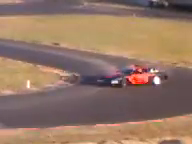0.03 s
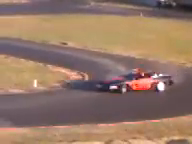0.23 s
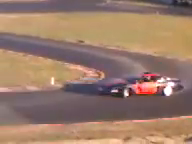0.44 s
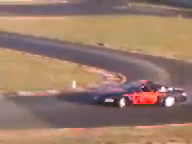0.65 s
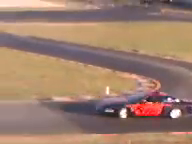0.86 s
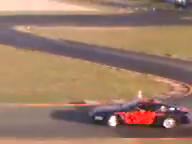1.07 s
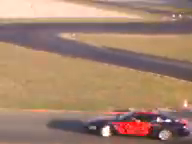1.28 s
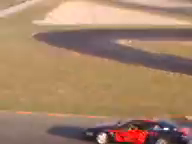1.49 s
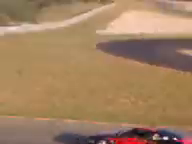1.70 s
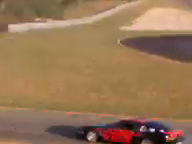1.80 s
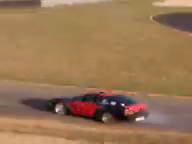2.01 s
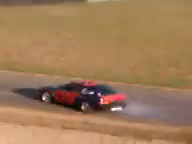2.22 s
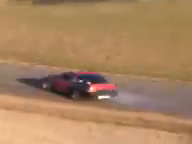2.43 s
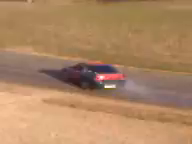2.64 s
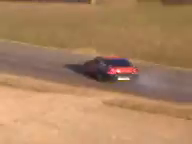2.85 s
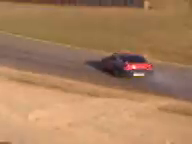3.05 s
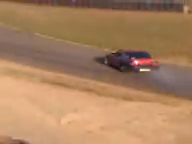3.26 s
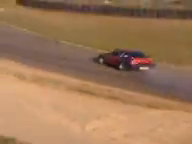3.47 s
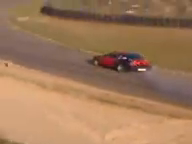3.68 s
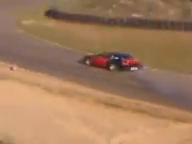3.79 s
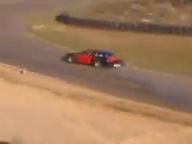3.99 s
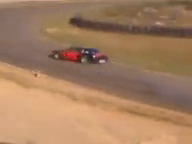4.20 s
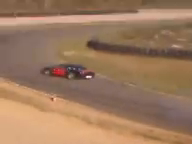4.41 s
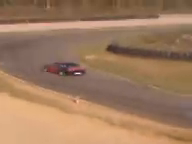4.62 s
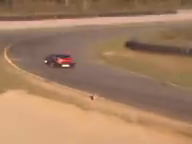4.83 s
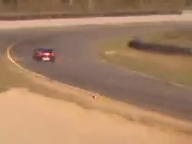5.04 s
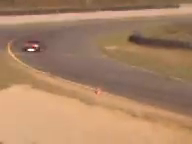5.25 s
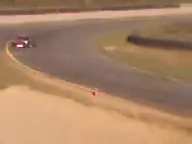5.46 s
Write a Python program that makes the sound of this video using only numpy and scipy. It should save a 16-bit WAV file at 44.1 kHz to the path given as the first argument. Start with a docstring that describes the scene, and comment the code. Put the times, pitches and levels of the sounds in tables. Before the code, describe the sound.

A car slides round a race-track bend, heard from the bank. Two tyres squeal at once, one clear and wavering, one higher and hoarse, loud for nearly three seconds. Rasping scrub and high torn shrieks flare midway, then the sound thins to short squeals and ends with a lower cry. Engine and road roar stay very faint. Narrow, dull microphone outdoors with slight echoes.

```python
"""A race circuit, heard from the spectators' bank: a car drifts round a bend.
Two tyres squeal by stick and slip, one in a clear wavering note with an octave, the other higher and hoarse.
Tread blocks scrub and rasp at random, and their stiff edges shriek in short bursts.
The slide eases, bites again and ends in a lower squeal as the car swings back.
Engine orders that rev up and swell, a sinking road roar and an uneven low rumble stay far underneath."""
import sys
import numpy as np
from scipy import signal
from scipy.fft import rfft, irfft
from scipy.io import wavfile
from scipy.ndimage import uniform_filter1d

SR = 44100
rng = np.random.default_rng(int(sys.argv[2]) if len(sys.argv) > 2 else 0)


def master_out(mix):
    """Clip the mix to full scale and print it as 16-bit PCM to the path in sys.argv[1]."""
    frames = np.transpose(np.atleast_2d(mix))
    ceiling = np.clip(frames, -1, 1)
    pcm = np.round(ceiling * 32767).astype(np.int16)
    wavfile.write(sys.argv[1], SR, pcm)


N = 242616
TIME = np.arange(N) / SR

# the car is nearest, then turns its tail to the listener
NEAREST_S, TURN_S, TURN_LENGTH_S = 2.07, 2.75, .6
# the exhaust points at the listener
EXHAUST_S, EXHAUST_LENGTH_S = 3.9, 1.6


def from_db(db):
    """Decibels to gain."""
    return 10 ** (np.asarray(db) / 20)


def rms_one(x):
    """Scale to an rms of 1."""
    return x / np.sqrt(np.mean(x ** 2) + 1e-20)


def level_curve(rows):
    """The second column of a table, drawn in straight lines over the first column's times."""
    at_s, value = np.transpose(rows)
    return np.interp(TIME, at_s, value)


def swell(at_s, length_s):
    """A smooth bump of height 1."""
    return np.exp(-(2 * (TIME - at_s) / length_s) ** 2)


def held(start_s, end_s, rise_db_per_s, fall_db_per_s):
    """Envelope in dB: rises to 0 at the start, holds, and falls after the end."""
    before_s = np.maximum(start_s - TIME, 0)
    after_s = np.maximum(TIME - end_s, 0)
    return -rise_db_per_s * before_s - fall_db_per_s * after_s


def through_turn(before, after):
    """A value that glides from one state to the other as the car turns away."""
    turned = (1 + np.tanh(2 * (TIME - TURN_S) / TURN_LENGTH_S)) / 2
    return before + (after - before) * turned


def far_db(loss_db_per_s):
    """Loss with distance, before and after the nearest point."""
    return -loss_db_per_s * np.abs(TIME - NEAREST_S)


def drift(rate):
    """Smooth random curve that changes about `rate` times a second; rms 1."""
    hz = np.fft.rfftfreq(N, 1 / SR)
    return rms_one(irfft(rfft(rng.standard_normal(N)) / (1 + (hz / rate) ** 2), N))


def coloured_noise(spectrum):
    """Noise with the given spectrum, falling steeply past its ends; rms 1."""
    hz = np.maximum(np.fft.rfftfreq(N, 1 / SR), 1)
    at_hz, db = np.transpose(spectrum)
    skirts = np.minimum(1, np.minimum(hz / at_hz[0], at_hz[-1] / hz)) ** 4
    gain = from_db(np.interp(np.log(hz), np.log(at_hz), db))
    return rms_one(irfft(rfft(rng.standard_normal(N)) * skirts * gain, N))


def narrow_noise(centre_hz, half_width_hz):
    """A resonance kept ringing by countless small slips: a carrier with random amplitude and phase; rms 1."""
    phase = 2 * np.pi * np.cumsum(centre_hz * np.ones(N)) / SR
    return rms_one(drift(half_width_hz) * np.cos(phase) + drift(half_width_hz) * np.sin(phase))


def resonate(x, hz, width_hz):
    """A resonance with gain near 1 on top and steep skirts: two equal sections in a row."""
    r = np.exp(-np.pi * width_hz * np.sqrt(2) / SR)
    gain = (1 - r * r) / 2
    section = [gain, 0, -gain, 1, -2 * r * np.cos(2 * np.pi * hz / SR), r * r]
    return signal.sosfilt([section, section], x)


def stick_slip(pitch_hz, waver, waver_hz, jitter, jitter_hz):
    """Running phase of a slip rate that wavers slowly and jitters fast, both as shares of the pitch."""
    rate = pitch_hz * (1 + waver * drift(waver_hz) + jitter * drift(jitter_hz))
    return 2 * np.pi * np.cumsum(rate) / SR


def grip(depth_db, rate_hz):
    """Uneven grip makes a sound flutter; its peaks are limited and the mean power holds."""
    gain = from_db(depth_db * 2 * np.tanh(drift(rate_hz) / 2))
    return gain / np.sqrt(uniform_filter1d(gain ** 2, size=SR // 6))


def raggedness(excess_db):
    """How unevenly rubber lets go, 1 at its usual level: a strong squeal locks in, a weak one falls apart."""
    ragged_per_db = 0.85  # dB of raggedness per dB below the usual level
    return np.minimum(from_db(-ragged_per_db * excess_db), 2)


def clear_squeal(pitch_hz, first_db, second_db, ragged, waver, jitter, flutter_db, breakup_db, neighbour_db):
    """A tyre locked into one slip rate; ragged slips roughen the note and its octave."""
    phase = stick_slip(pitch_hz, waver * ragged, 31.73, jitter * ragged, 260)
    # a neighbouring rib strays a little below the note and beats with it
    stray = stick_slip(pitch_hz * .98, 0.019, 25.66, 0.0201, 188.8)
    neighbour = from_db(neighbour_db) * ragged

    first = np.sin(phase) * grip(2.1 * ragged, 81)
    first = first + 0.45 * neighbour * np.sin(stray)
    second = np.sin(2 * phase + .5 * ragged * drift(91)) * grip(breakup_db * ragged, 22)
    second = second + neighbour * np.sin(2 * stray) * grip(2.1, 40)
    return grip(flutter_db * ragged, 150) * (from_db(first_db) * first + from_db(second_db) * second)


def outer_tyre(octave_share, flare_db):
    """The loaded tyre sings through the long slide, flaring with the load and fading as it comes off."""
    # slip rate through the slide, before the wheel's swing: t/s, f/Hz
    slip_rate = [(0.0, 1122), (0.05, 1100), (0.22, 1208), (0.42, 1247), (0.45, 1182), (0.6, 1275),
                 (0.66, 1157), (1.12, 1250), (1.58, 1304), (1.73, 1194), (1.87, 1213), (2.12, 1131),
                 (2.33, 1534), (2.5, 1438), (2.52, 1297), (2.59, 1228), (2.62, 1110), (2.9, 1148)]
    # the note sags where the load shifts and surges where the whole tread locks into step:
    # t/s, length/s, gain/dB
    load_shifts = [(0.043, 0.049, -3.5), (.25, 0.25, 2.5), (.7, 0.15, -7.5), (1.419, 0.31, 1),
                   (1.902, .3, 1.5), (2.223, 0.061, 15.5), (2.324, .16, -7.5), (2.833, 0.12, -7),
                   (3.136, 0.088, 9.5)]
    # the note holds until the load comes off, then fades; the octave lasts a little longer
    note_db, note_end_s, note_fade_db_per_s = -17, 2.626, 23
    octave_base_db, octave_end_s, octave_fade_db_per_s = -20.5, 2.93, 60.5
    # the octave weakens as the slip rate rises above its usual value
    usual_slip_hz, octave_loss_db_per_hz = 1221, 0.1311
    # the slip rate swings by this share with each turn of the wheel
    wheel_hz, wheel_swing = 9.3, .015

    pitch_hz = level_curve(slip_rate) * (1 + wheel_swing * np.sin(2 * np.pi * wheel_hz * TIME))
    load_db = held(0, note_end_s, 0, note_fade_db_per_s)
    for at_s, length_s, db in load_shifts:
        load_db = load_db + db * swell(at_s, length_s)
    ragged = np.minimum(raggedness(load_db), 1.3)

    pitch_loss_db = np.minimum(octave_loss_db_per_hz * (usual_slip_hz - pitch_hz), 0)
    octave_db = octave_base_db + pitch_loss_db + octave_share * np.minimum(load_db, 0)
    octave_db = octave_db + held(0, octave_end_s, 0, octave_fade_db_per_s) + far_db(loss_db_per_s=3.5)
    squeal = clear_squeal(pitch_hz, note_db + load_db, octave_db, ragged,
                          waver=.012, jitter=0.0083, flutter_db=2.5, breakup_db=2, neighbour_db=-5.5)
    return squeal * grip(flare_db, 22)


def hoarse_squeal(pitch_hz, loud_db, usual_db, octave_db, spread, jitter):
    """Three tread ribs slip at different rates and beat; ragged sliding pulls them apart."""
    ragged = np.maximum(raggedness(loud_db - usual_db), .95)
    tone = 0
    for rib in (-1, 0, 1):
        rib_hz = pitch_hz * (1 + spread * ragged * rib)
        phase = stick_slip(rib_hz, .024 * ragged, 25.004, jitter, 241.6)
        tone = tone + grip(4.3, 53) * (np.sin(phase) + from_db(octave_db) * np.sin(2 * phase))
    return from_db(loud_db) * rms_one(tone)


def inner_tyre(level_db):
    """The lighter tyre: a long slide that drops in pitch as the car turns away, short ones, and hard bites."""
    # long slide: t/s, relative level/dB
    long_slide = [(0.0, -26), (0.03, -32), (0.27, -25), (0.98, -20), (1.5, -27), (1.59, -20), (1.81, -26.5),
                  (2.14, -23), (2.44, -14), (2.73, -26), (3.16, -17.5), (3.21, -24.5), (3.44, -27.5),
                  (3.84, -47.5), (3.9, -36.5)]
    # short slides where it breaks loose again: start/s, end/s, f/Hz, level/dB
    short_slides = [(4.239, 4.371, 1299, -23), (4.479, 4.789, 1363, -23.5), (5.162, 5.425, 1251, -24)]
    # brief hard bites: t/s, length/s, gain/dB
    bites = [(0.663, 0.006, 11), (2.431, 0.0056, 5.5), (2.594, 0.0057, 5.5), (2.969, 0.0087, 10.5),
             (3.064, 0.021, 3.5), (4.574, 0.0096, 5.5), (4.822, 0.0061, 0)]
    rise_db_per_s, fall_db_per_s = 90, 126.5

    pitch_hz = through_turn(1437.5, 1374)
    loud_db = level_db + level_curve(long_slide) + held(0, long_slide[-1][0], 0, fall_db_per_s)
    for start_s, end_s, hz, db in short_slides:
        slide_db = db + held(start_s, end_s, rise_db_per_s, fall_db_per_s)
        # the louder slide sets the pitch
        pitch_hz = np.where(slide_db > loud_db, hz, pitch_hz)
        loud_db = np.maximum(slide_db, loud_db)
    bite_db = sum(db * swell(at_s, length_s) for at_s, length_s, db in bites)
    squeal = hoarse_squeal(pitch_hz, loud_db, usual_db=-20, octave_db=-35.0, spread=.033, jitter=.022)
    return from_db(bite_db) * squeal


def scrub(level_db, rasp_db, slips_per_s, size_db):
    """Tread blocks snap loose at random and ring; tearing rubber adds a fine rasp."""
    # resonances of the tread blocks: f/Hz, width/Hz, relative level/dB
    tread_modes = [(1133, 212, -1.5), (1350, 207, 2), (1773, 280, 0), (2143, 150, -2.5), (2226, 235, -8.5)]
    # scrubbing tread: t/s, relative level/dB
    scrub_level = [(0.0, -30), (0.49, -31), (0.6, -40.5), (0.73, -28.5), (1.87, -36.5), (2.17, -31),
                   (2.24, -34.5), (2.31, -30.5), (2.5, -28.5), (2.51, -31), (2.62, -28), (3.92, -37),
                   (4.29, -29), (4.76, -37), (4.87, -41.5), (5.19, -39.5), (5.28, -28), (5.5, -29.5)]
    # spectrum of torn rubber: f/Hz, relative level per Hz/dB
    rasp_spectrum = [(2000, -11), (2450, 6.5), (2750, 0.5), (3050, -1.5), (3300, -9), (3600, -20),
                     (4000, -28.5), (4400, -47.5)]
    # fine rasp: t/s, relative level/dB
    rasp_level = [(0.0, -48), (0.69, -50), (1.15, -37.5), (2.04, -41.5), (2.48, -31), (2.63, -44),
                  (3.15, -44), (3.29, -51.5), (4.52, -51.5), (4.58, -45.5), (4.86, -59.5), (5.5, -47)]

    happens = rng.random(N) < slips_per_s / SR
    slips = happens * rng.choice([-1, 1], N) * from_db(size_db * rng.standard_normal(N))
    rings = 0
    for k, (hz, width_hz, db) in enumerate(tread_modes):
        # neighbouring modes ring with opposite sign
        rings = rings + (-1) ** k * from_db(db) * resonate(slips, hz, width_hz)
    rasp = from_db(level_curve(rasp_level) + rasp_db) * coloured_noise(rasp_spectrum) * grip(4.1, 53)
    return from_db(level_curve(scrub_level) + level_db) * rms_one(rings) + rasp


def engine(level_db):
    """Exhaust orders on a hunting firing rate that revs up out of the bend, loudest with the exhaust this way."""
    # exhaust orders: multiple of the firing rate, relative level/dB
    engine_orders = [(.5, -19.5), (1, 6), (1.5, -6.5), (2, -3), (3, 2), (4, -12)]
    firing_hz = through_turn(177, 201)
    phase = stick_slip(firing_hz, 0.0093, 9.3, .012, 75)
    orders = sum(from_db(db) * np.sin(k * phase) * grip(7.8, 9.1) for k, db in engine_orders)
    exhaust_db = 14 * swell(EXHAUST_S, EXHAUST_LENGTH_S)
    return from_db(level_db + exhaust_db) * orders


def road_roar(hollow_db, tail_on_db, skirt_db, half_width_hz, coming_hz, going_hz):
    """Air pumped through the rolling tread; its hollow peak sinks and grows as the car turns its tail."""
    # broad skirt of the roar: f/Hz, relative level per Hz/dB
    roar_spectrum = [(280, -10.5), (420, -16), (520, -4), (620, 0), (780, 3.5), (900, 1.5), (1100, -2),
                     (1600, -21)]
    peak_db = hollow_db + tail_on_db * swell(EXHAUST_S, EXHAUST_LENGTH_S)
    hollow = from_db(peak_db) * narrow_noise(through_turn(coming_hz, going_hz), half_width_hz)
    skirt = from_db(skirt_db) * coloured_noise(roar_spectrum)
    return from_db(far_db(loss_db_per_s=1.24)) * (hollow + skirt) * grip(2.1, 9)


def circuit():
    """Low rumble of the open circuit: coloured noise whose level holds, then rises and dips quickly near the end."""
    # spectrum of the rumble: f/Hz, relative level per Hz/dB
    rumble_spectrum = [(20, -42.5), (45, -16.5), (70, -5.5), (115, -1.5), (170, -1), (290, -2.5), (400, -2),
                       (520, -2)]
    # rumble: t/s, level/dB
    rumble_level = [(0.0, -48.5), (3.97, -46.5), (4.76, -52), (4.9, -44), (5.33, -54), (5.5, -47.5)]
    return from_db(level_curve(rumble_level)) * coloured_noise(rumble_spectrum)


def shriek(half_width_hz):
    """The stiff edges of the tread ring high, in torn bursts."""
    # bursts: t/s, length/s, f/Hz, level/dB
    edge_bursts = [(2.35, 0.078, 3120, -33.5), (2.49, .11, 2980, -29.5), (4.592, 0.061, 2934, -39),
                   (4.684, 0.042, 3100, -44.5)]
    bursts = 0
    for at_s, length_s, hz, db in edge_bursts:
        ring = rms_one(resonate(narrow_noise(hz, half_width_hz), hz, 650))
        bursts = bursts + from_db(db) * swell(at_s, length_s) * ring
    return bursts * grip(5, 42)


def swing_back():
    """The loaded tyre bites again at a lower rate; the note falls apart and its octave takes over."""
    start_s, break_s = 5.085, 5.22
    note_db = -23 + held(start_s, break_s, rise_db_per_s=452, fall_db_per_s=75)
    octave_db = -27.5 + held(break_s, TIME[-1], rise_db_per_s=400, fall_db_per_s=0)
    return clear_squeal(996, note_db, octave_db, ragged=0.77, waver=0.0204, jitter=.022,
                        flutter_db=4.0, breakup_db=4.0, neighbour_db=-3.5)


def off_ground(x):
    """Direct and ground-reflected paths interfere and hollow out broad noise; the power is kept."""
    delay_s, bounce = 0.00283, from_db(-22.5)
    reflected = bounce * np.interp(TIME - delay_s, TIME, x, left=0)
    return (x + reflected) / np.sqrt(1 + bounce ** 2)


def outdoors(x):
    """A few dull echoes follow the direct sound."""
    # echoes from the ground, barriers and bank: delay/s, level/dB
    echoes = [(.007, -15.5), (0.028, -24), (0.083, -14), (0.144, -32)]
    dull = signal.sosfilt(signal.butter(1, 3000, fs=SR, output="sos"), x)
    return x + sum(from_db(db) * np.interp(TIME - delay_s, TIME, dull, left=0) for delay_s, db in echoes)


def scene():
    """Both tyres judder together on the axle, above engine and road."""
    squeals = outer_tyre(octave_share=0.13, flare_db=1.3) + inner_tyre(level_db=0.35) + swing_back()
    tread = off_ground(scrub(level_db=5.0, rasp_db=3.5, slips_per_s=2300, size_db=3.5))
    tread = tread + shriek(half_width_hz=110)
    tyres = (squeals + tread) * grip(1.0, 29)
    roar = road_roar(hollow_db=-40.5, tail_on_db=6.5, skirt_db=-39.5,
                     half_width_hz=120, coming_hz=810.3, going_hz=678.7)
    background = off_ground(roar + circuit())
    return (outdoors(tyres) + engine(level_db=-71.5) + background)[None]


def record(dry):
    """A narrow-band microphone rounds the peaks; any crest past its full scale is clipped."""
    headroom, full_scale = .79, .72
    rounded = dry / (1 + (dry / headroom) ** 6) ** (1 / 6)
    # both low-passes are 70 dB down at the stated frequency
    narrow = signal.sosfilt(signal.cheby2(14, 70, 4750, fs=SR, output="sos"), rounded)
    clipped = np.clip(narrow, -full_scale, full_scale)
    return signal.sosfilt(signal.cheby2(12, 70, 16000, fs=SR, output="sos"), clipped)


dry = scene()
out = record(dry)
master_out(out)
```